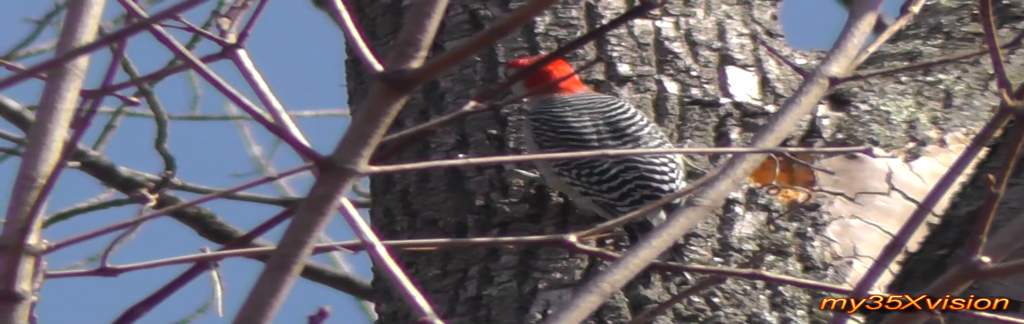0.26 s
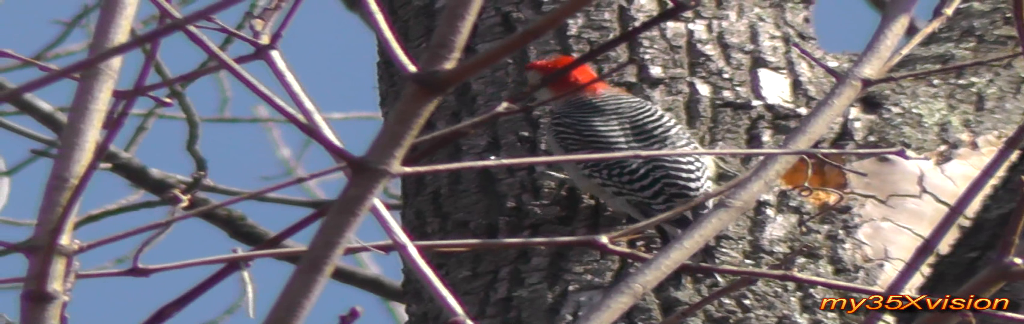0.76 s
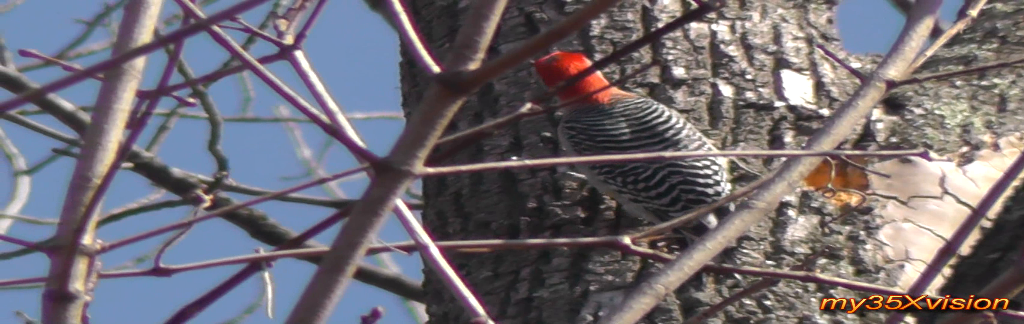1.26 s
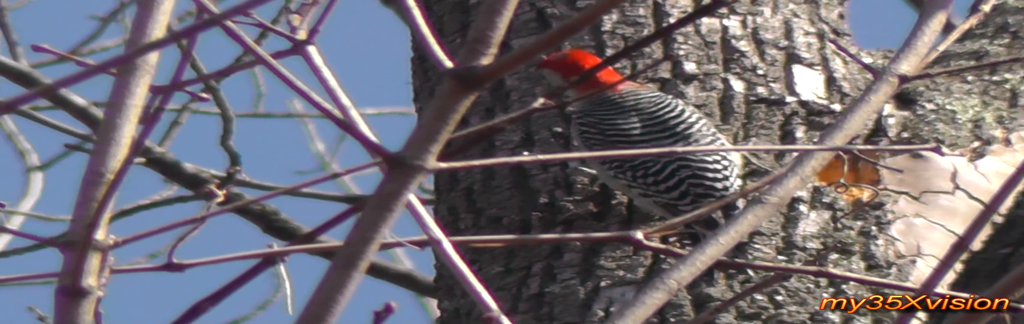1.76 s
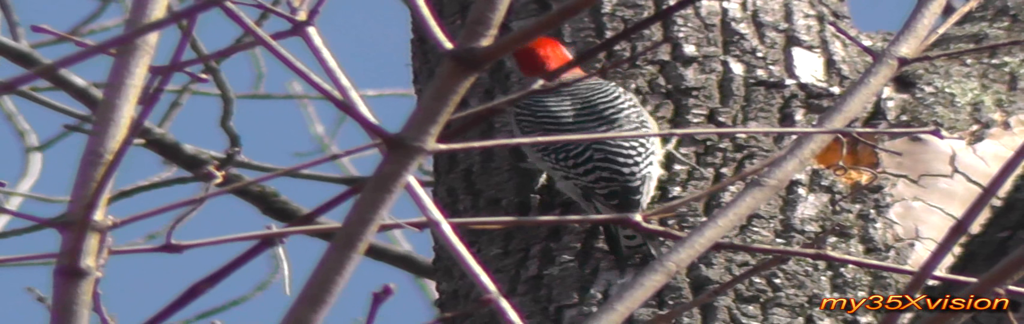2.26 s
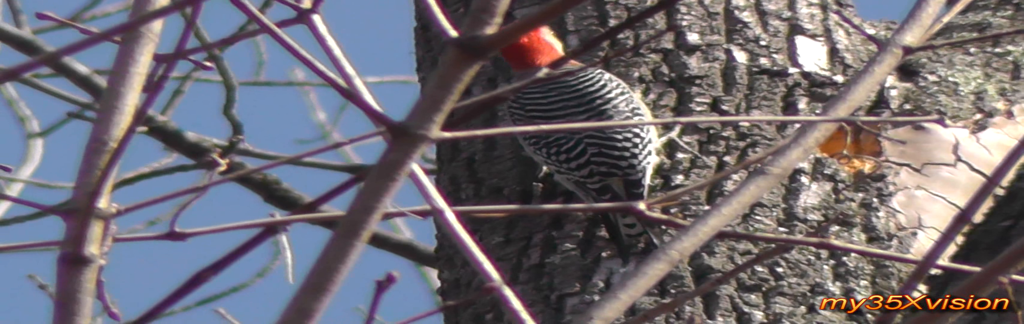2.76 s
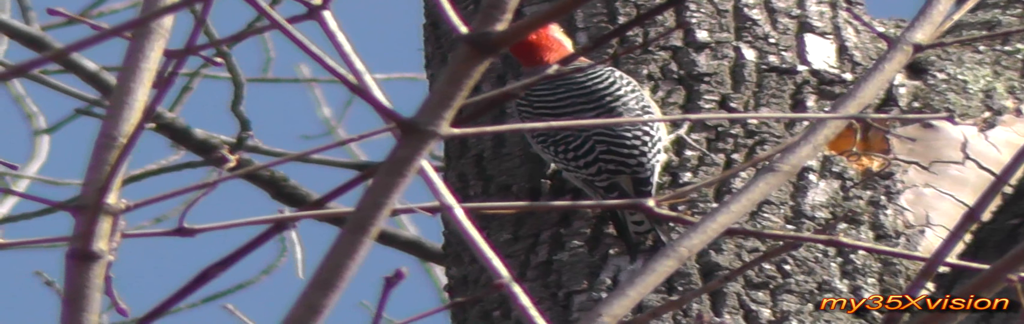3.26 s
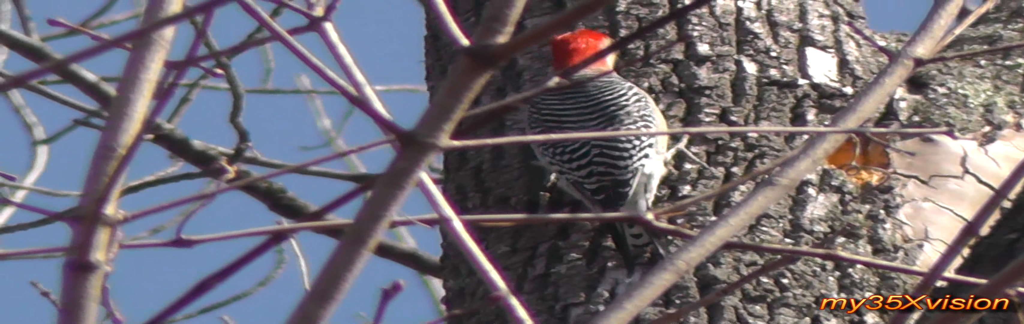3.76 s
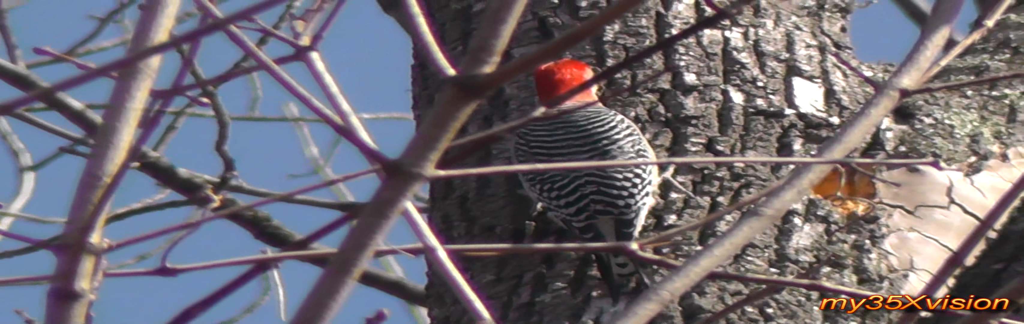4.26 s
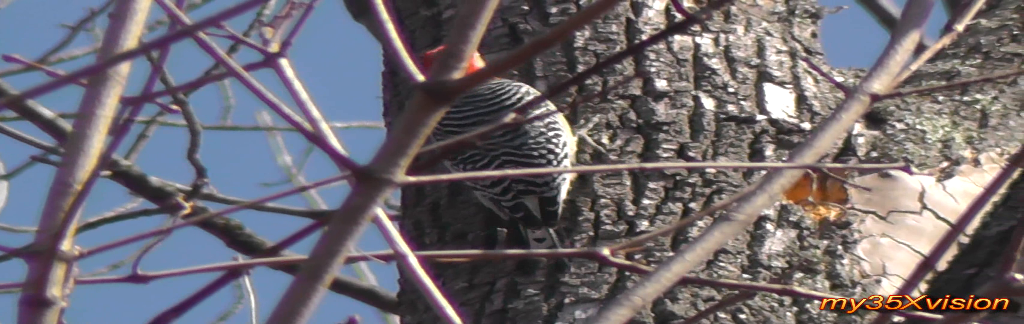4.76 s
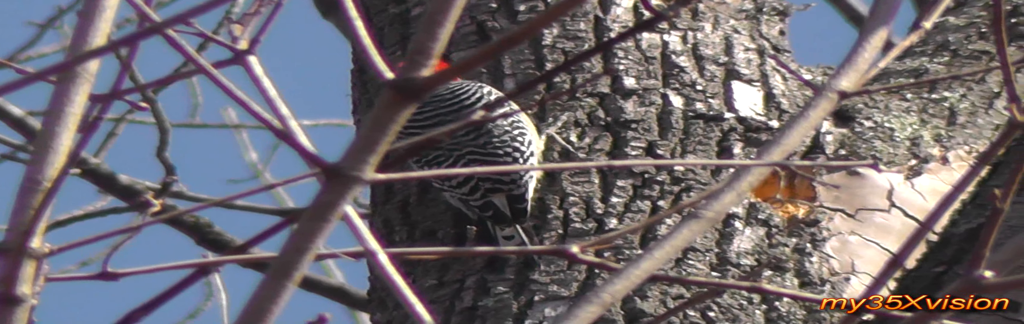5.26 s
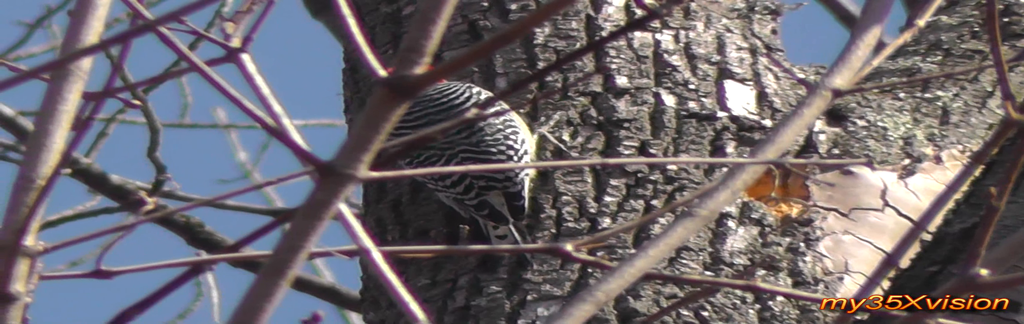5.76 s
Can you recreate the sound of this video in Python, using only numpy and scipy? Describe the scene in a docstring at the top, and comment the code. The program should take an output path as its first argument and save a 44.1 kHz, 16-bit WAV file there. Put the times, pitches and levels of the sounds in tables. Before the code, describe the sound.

A woodpecker calls from a tree trunk straight ahead, outdoors in a park. It gives four churr calls, each about a third of a second long: a short nasal rise that breaks into a fast, hoarse, rolling trill and sinks at the end. The first comes right at the start, the second at about 1 second, the third at 2.2 seconds with a brighter ending, and the fourth at 3.9 seconds. Each echoes faintly among the trees. The bird also taps the bark lightly, with a quick pair of dry ticks at about 3.6 seconds and a single tick at 5.4 seconds. The calls are the loudest sounds. Beneath them, for the whole six seconds, distant traffic makes a low rumble that swells slightly around 2.6 and 4.8 seconds, joined by a faint wavering machine hum and a thin, steady high hiss.

```python
"""A woodpecker on a tree trunk gives four rolling "churr" calls: a short nasal rise, then a fast trill.
Its voice box makes a buzzy tone that rings through throat and bill. Trunk and limbs throw the calls
back and the park answers faintly; the bird ticks on the bark three times.
Behind it, distant traffic rumbles, with a machine hum and a thin steady hiss."""
import sys
import numpy as np
from scipy import signal
from scipy.fft import rfft, irfft, next_fast_len
from scipy.io import wavfile
from scipy.ndimage import map_coordinates

SR = 44100
rng = np.random.default_rng(int(sys.argv[2]) if len(sys.argv) > 2 else 0)


def master_out(mix):
    """Clip the mix to full scale and print it as 16-bit PCM to the path in sys.argv[1]."""
    frames = np.transpose(np.atleast_2d(mix))
    ceiling = np.clip(frames, -1, 1)
    pcm = np.round(ceiling * 32767).astype(np.int16)
    wavfile.write(sys.argv[1], SR, pcm)


N = 264820
TOP_HZ = 15950  # the highest frequency kept


def amp(db):
    """Turn decibels into a factor to multiply by."""
    return 10 ** (np.asarray(db) / 20)


def unit(x):
    """Scale x to an average (rms) strength of 1."""
    return x / np.sqrt(np.mean(x ** 2) + 1e-20)


def along(points, hz):
    """Read between (frequency, value) rows, on a log frequency scale."""
    f, v = np.transpose(points)
    return np.interp(np.log(hz + 1), np.log(f + 1), v)


def curve(rows):
    """Turn (time, value) rows into one value per sample."""
    return np.interp(np.arange(N) / SR, *np.transpose(rows))


def wobble(rate, size):
    """A smooth curve through rate random values a second."""
    return map_coordinates(rng.standard_normal(size + 4), [np.arange(size) * min(rate / SR, 1)])


def filtered(x, response):
    """Multiply each frequency in x by response(hz)."""
    size = next_fast_len(N + SR // 2)
    return irfft(rfft(x, size) * response(np.fft.rfftfreq(size, 1 / SR)), size)[..., :N]


def ringing(x, colour):
    """Filter x by colour(hz) so that it rings after each sound, never before."""
    def response(hz):
        cepstrum = irfft(np.log(np.maximum(colour(hz), 1e-6)))
        half = len(cepstrum) // 2
        return np.exp(rfft(np.r_[cepstrum[0], 2 * cepstrum[1:half]], len(cepstrum)))
    return filtered(x, response)


def bump(hz, centre, width):
    """A resonance: a steep-sided peak of height 1."""
    return 1 / (1 + ((hz - centre) / width) ** 2 * 2) ** 2


# how alike left and right sound: (frequency [Hz], likeness [0 to 1])
LIKENESS = [(60, 1), (99, 0.99), (160, 1.0), (270, 0.98), (450, 0.82), (740, 0.82), (1220, 0.59),
            (2010, 0.81), (3330, 0.88), (5500, 1), (9080, 0.77), (15000, 0.1)]
def rush(colour):
    """Stereo noise of strength 1, shaped by colour(hz), nearly mono in the bass."""
    def shape(hz):
        angle = np.arccos(np.clip(along(LIKENESS, hz), 0, 1)) / 2
        return colour(hz) * [np.cos(angle), np.sin(angle)]
    mid, side = filtered(rng.standard_normal((2, N)), shape)
    return unit(np.array([mid + side, mid - side]))


# how loud engines and tyres are: (time [s], level [dB])
ENGINE_LEVEL = [(0, -39), (1.7, -39.2), (2.6, -37.3), (3.6, -39), (4.8, -37.4), (6, -39)]
TYRE_LEVEL = [(0, -47.2), (3.7, -47.5), (4.8, -46)]
# their mix of low and high: (frequency [Hz], relative level [dB])
ENGINE_COLOUR = [(10, -60), (22, -40), (30, -26), (42, -16.5), (54, -8), (75, 1.5), (100, 1), (135, 2.5),
                 (190, 5.5), (240, 0.5), (290, -5.5), (400, -12.5), (700, -48)]
TYRE_COLOUR = [(200, -7.5), (400, 1.5), (700, 0), (1000, -4.5), (1500, -10.5), (2000, -19.5), (3000, -30),
               (8000, -45)]
def traffic(swell_db=0.6, swells_per_s=3.3):
    """Far engines rumble, swelling at random, over a soft roar of tyres."""
    engine_db = curve(ENGINE_LEVEL) + swell_db * wobble(swells_per_s, N)
    engines = amp(engine_db) * rush(lambda hz: amp(along(ENGINE_COLOUR, hz)))
    tyres = amp(curve(TYRE_LEVEL)) * rush(lambda hz: amp(along(TYRE_COLOUR, hz)))
    return engines + tyres


# the machine's tones: (pitch [Hz], level [dB], pitch waver [Hz])
HUM_TONES = [(179.3, -45.5, 5.92), (299.6, -50, 4.93)]
def machine_hum(flicker_db=4.0):
    """A distant machine hums two tones that waver in pitch and loudness."""
    out = np.zeros(N)
    for hz, db, waver_hz in HUM_TONES:
        flicker = amp(flicker_db * wobble(12, N))
        phase = 2 * np.pi * np.cumsum(hz + waver_hz * wobble(25, N)) / SR
        out += amp(db) * unit(flicker * np.sin(phase))
    return out


# the tone of the hiss: (frequency [Hz], relative level [dB])
HISS_COLOUR = [(1180, -16), (2000, -24.5), (2130, -15.5), (2510, 0.5), (2620, 2.5), (3060, -2), (3830, -21),
               (4600, -18), (5190, -11.5), (5610, -15), (5910, -7), (6280, -10), (6620, -3), (6850, -8.5),
               (7350, -18.5), (15200, -22.5), (15900, -30)]
def hiss(level_db=-56):
    """A thin steady hiss, strongest in two whirring bands."""
    return amp(level_db) * rush(lambda hz: amp(along(HISS_COLOUR, hz)))


# the bird's taps: (time [s], relative level [dB])
TAPS = [(3.5553, -30.5), (3.592, -33), (5.3974, -34.2)]
# how the bark rings: (frequency [Hz], boost [dB])
BARK_COLOUR = [(1500, -20), (2500, -6), (3150, 7), (4200, -5), (7500, -3), (10000, -18), (15000, -25)]
def bark_ticks(boost_db=6, rise_s=.00053, fade_s=.009):
    """Each tap is a dry little snap of noise that rings in the bark."""
    out, t = np.zeros(N), np.arange(SR // 20) / SR
    envelope = amp(-60 * t / fade_s) * (1 - np.exp(-t / rise_s))
    for time, db in TAPS:
        snap = envelope * rng.standard_normal(len(t))
        out[round(time * SR):][:len(t)] += amp(db + boost_db) * snap
    return ringing(out, lambda hz: amp(along(BARK_COLOUR, hz)))


def scattered(x, fade_times, width):
    """A wash of echoes; each (frequency, time) row says how long it takes to fade by 60 dB."""
    hz, t, spectrum = signal.stft(rng.standard_normal((2, SR)), SR, nperseg=256)
    fade = amp(-60 * t / along(fade_times, hz)[:, None])
    mid, side = signal.istft(spectrum * fade, SR, nperseg=256)[1]
    tail = np.array([mid + width * side, mid - width * side])
    return signal.fftconvolve(x[None], tail / np.linalg.norm(tail[0]), axes=1)[:, :N]


# echoes off trunk and limbs: (delay [s], level [dB])
TREE_ECHOES = [(.001525, -9), (.00641, -14)]
# how long the park rings: (frequency [Hz], time to fade by 60 dB [s])
PARK_FADE = [(300, 0.31), (1500, 1), (6000, 1), (12000, 0.75)]
def among_trees(voice, twigs_db=-7, park_db=-14):
    """The voice is doubled by trunk and limbs, blurred by twigs and answered by the park."""
    def echoes(hz):
        return sum(amp(db) * np.exp(-2j * np.pi * hz * delay) for delay, db in TREE_ECHOES)
    near = filtered(voice, lambda hz: 1 + echoes(hz))
    twigs = scattered(near, [(1500, 0.12), (7000, 0.2)], width=0.47)
    park = scattered(near, PARK_FADE, width=0.41)
    return near + amp(twigs_db) * twigs + amp(park_db) * park


# the rise that opens each call: (time into the call [s], pitch [Hz])
OPENING_RISE = [(0, 610), (.015, 890), (.027, 1005), (.044, 940)]
def pitch(t, start, end, first_crest, spacing, trill_after_s=.058, trough_hz=1030, scatter_hz=55):
    """The voice slides up, sags a little, then rolls in evenly spaced arches that sink at the end."""
    base_s, base_hz = np.transpose(OPENING_RISE + [(trill_after_s, trough_hz)])
    crests = np.arange(first_crest, end, spacing)
    crest_hz = np.interp(crests, [first_crest, first_crest + .04, end - .048, end],
                         [1660, 1755, 1755, 1400])
    height_hz = crest_hz - trough_hz + scatter_hz * rng.standard_normal(len(crests))
    arches = np.exp(-np.abs((t - crests[:, None]) / .0102) ** 3.8)  # flat-topped, about 20 ms wide
    return np.interp(t - start, base_s, base_hz) + height_hz @ arches


def voice_box(hz, hoarse, beat_hz=590, beat_depth=1.4, fray=.125, nasal_db=3, trough_db=-5):
    """A tone with overtones; when hoarse, a fast beat roughens it and the high ones fray most."""
    size, harmonic = len(hz), np.arange(1, 15)[:, None]
    crest = (hz - hz.min()) / np.ptp(hz)  # 0 at the lowest pitch, 1 at the highest
    beat = np.sin(2 * np.pi * np.cumsum(beat_hz * (1 + 0.15 * wobble(150, size))) / SR)
    flutter = np.array([wobble(800, size) for _ in harmonic]) * fray * harmonic * hoarse
    overtone_db = nasal_db * (1 - hoarse) * (harmonic > 2)  # the clean voice is rich in overtones
    gain = amp(overtone_db) * (harmonic * hz < TOP_HZ)
    tone = np.sum(gain * np.sin(2 * np.pi * harmonic * np.cumsum(hz) / SR + flutter), axis=0)
    depth = beat_depth * hoarse * crest ** 2  # the beat is deepest at the crests
    slack = np.clip(2 * (1 - crest), 0, 1) ** 2  # the voice slackens between rolls
    return tone * (1 + depth * beat) / (1 + depth * 2 / 3) * amp(trough_db * hoarse * slack)


# how the throat colours the voice: (frequency [Hz], boost [dB])
THROAT_COLOUR = [(500, -39), (820, -1), (1020, -1.5), (1450, 9), (1720, 3.5), (1930, -1), (2150, -11),
                 (2380, -21), (2750, -14), (3300, -24), (3900, -27), (4250, -31), (4600, -25), (7500, -24),
                 (8200, -39), (15000, -49)]
def throat_and_bill(source, tuning, bill):
    """Throat and bill ring, making some frequencies louder than others."""
    def colour(hz):
        bill_gain = 1 + sum((amp(db) - 1) * bump(hz, centre, width) for centre, width, db in bill)
        return amp(along(THROAT_COLOUR, hz / tuning)) * bill_gain
    return ringing(source, colour)


def churr(call, bill, shimmer_db=2.5, closing_hz=5600):
    """One call: a clean rise, then an ever hoarser trill, sounding through throat and bill."""
    start, end, db, closing_db, tuning, first_crest, spacing = call
    samples = np.arange(max(0, int(start * SR)), int((end + 0.017) * SR))
    t = samples / SR
    hoarse = np.interp(t - start, [.052, .07, .13], [0, .6, 1])
    melody_hz = pitch(t, start, end, first_crest, spacing)
    jitter = .02 * (0.3 + hoarse) * wobble(900, len(t))
    stumble = .058 * hoarse * wobble(160, len(t))
    tone = voice_box(melody_hz * (1 + jitter + stumble), hoarse)
    effort_db = np.interp(t - start, [0, .005, .03, .05, .065], [-28, -13.7, -6.7, -6.7, 0])
    ending_db = np.interp(t - end, [-.06, -.008, .02], [0, -5, -35])
    source = np.zeros(N)
    source[samples] = tone * amp(db + effort_db + ending_db + shimmer_db * wobble(400, len(t)))
    voice = throat_and_bill(source, tuning, bill)
    bright_db = curve([(end - .13, 0), (end - .03, closing_db)])  # one more resonance opens at the end
    return voice + (amp(bright_db) - 1) * filtered(voice, lambda hz: bump(hz, closing_hz, width=760))


# the calls: (start [s], end [s], relative level [dB], brightening at the end [dB],
# throat tuning [ratio], first crest of the trill [s], time between rolls [s])
CALLS = [(-.028, .299, -26.3, 1, 1.016, .038, .0377), (1.015, 1.354, -26, 3.5, 1.004, 1.083, .0374),
         (2.158, 2.497, -26.5, 14.5, 1.006, 2.221, .0373), (3.936, 4.256, -26, 3, 1.024, 4.001, .0379)]
# the bill's resonances, three for each call: (frequency [Hz], width [Hz], boost [dB])
BILL_RESONANCES = [
    [(6060, 270, 9.5), (6960, 910, 6.5), (8950, 1300, 10.5)],
    [(5400, 1200, 7.2), (7430, 1200, 8.5), (9400, 600, 4)],
    [(5030, 810, 7.5), (7440, 1500, 9), (9150, 650, 4)],
    [(4900, 1650, 11), (6900, 820, 15), (10500, 600, 9)],
]
def woodpecker():
    """The bird calls four times, and each call echoes among the trees."""
    return sum(among_trees(churr(call, bill)) for call, bill in zip(CALLS, BILL_RESONANCES))


def scene():
    """The bird straight ahead, over the steady background."""
    return woodpecker() + bark_ticks() + traffic() + machine_hum() + hiss()


def record(dry):
    """Cut away the very highest treble."""
    return filtered(dry, lambda hz: hz < TOP_HZ)


dry = scene()
out = record(dry)
master_out(out)
```